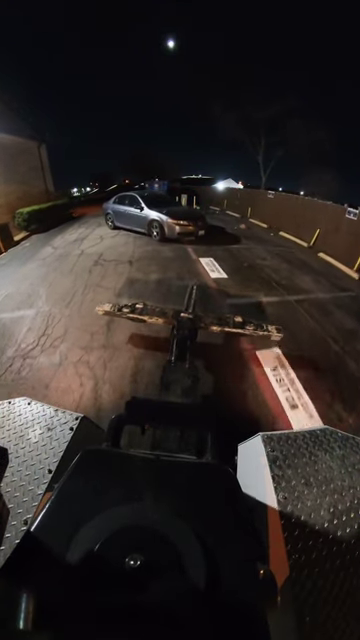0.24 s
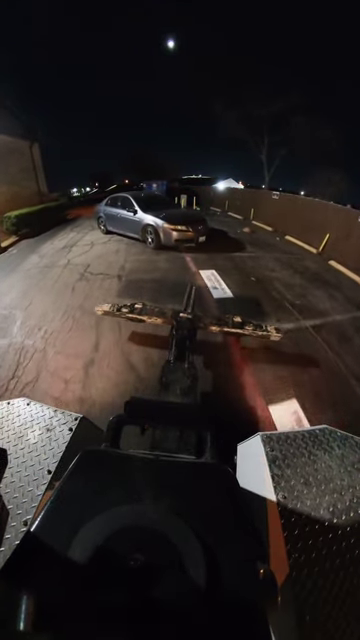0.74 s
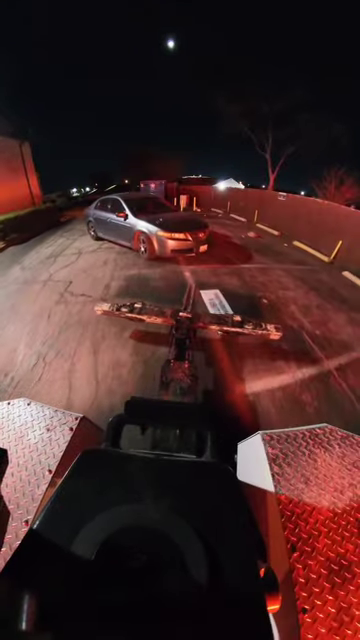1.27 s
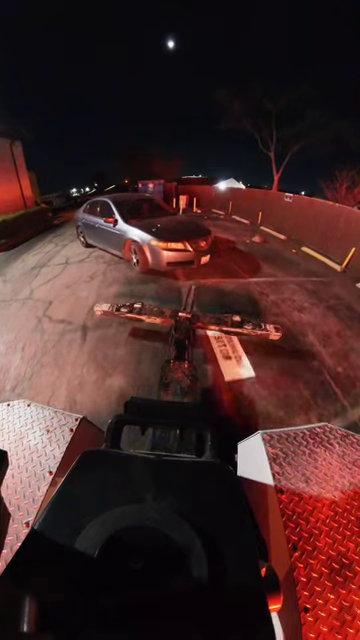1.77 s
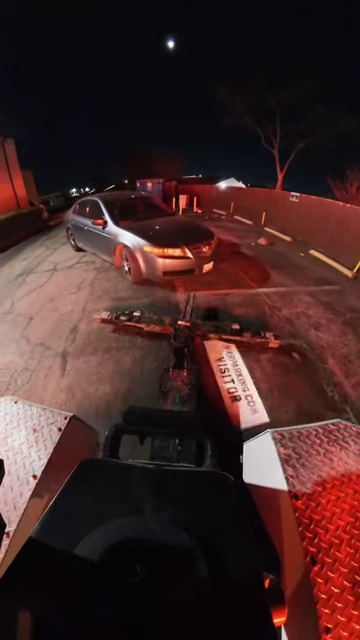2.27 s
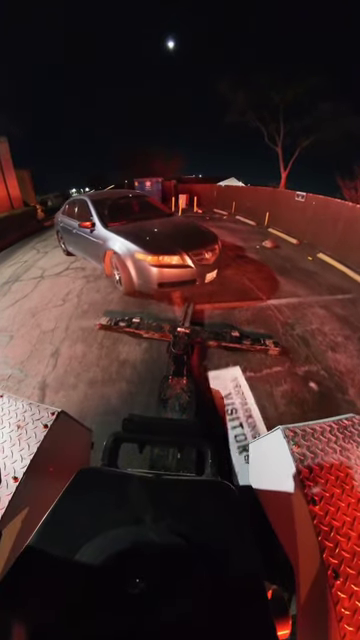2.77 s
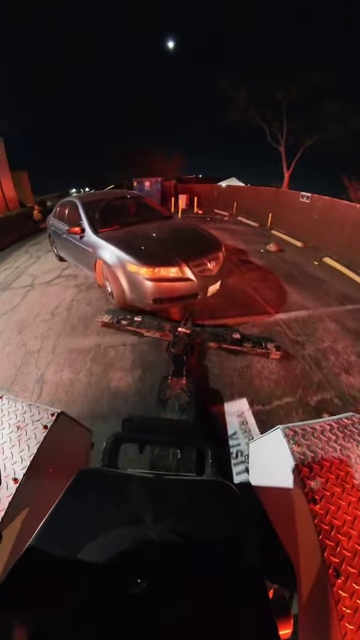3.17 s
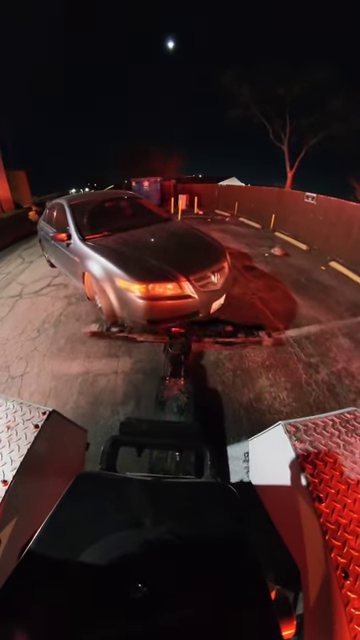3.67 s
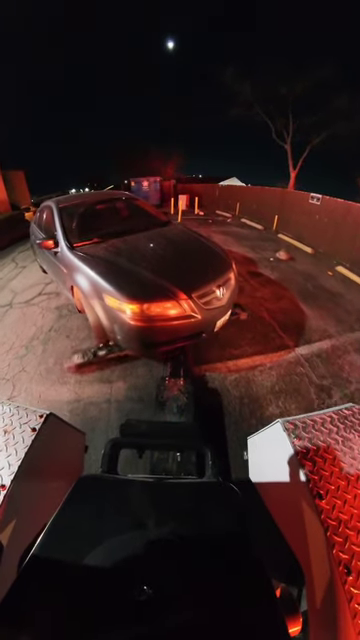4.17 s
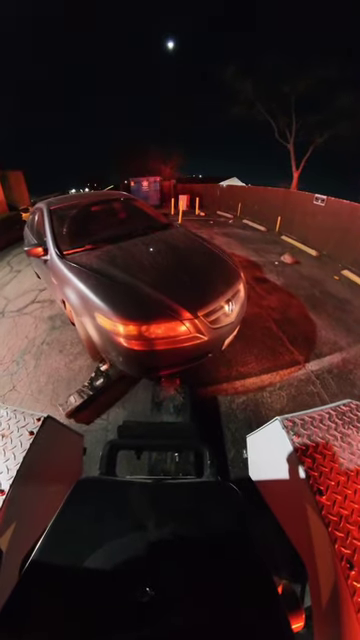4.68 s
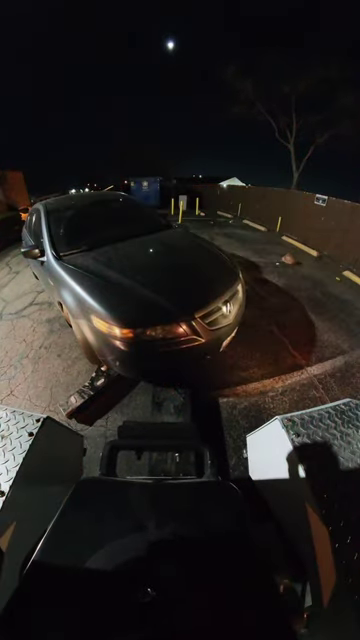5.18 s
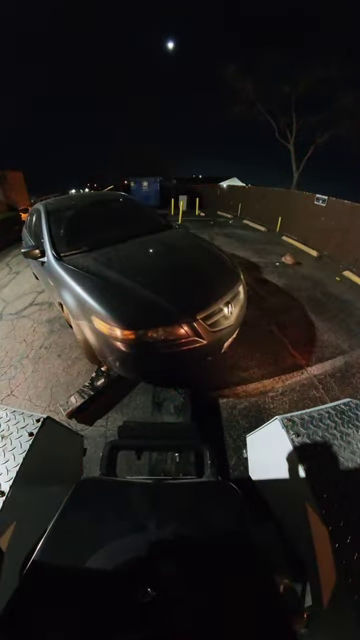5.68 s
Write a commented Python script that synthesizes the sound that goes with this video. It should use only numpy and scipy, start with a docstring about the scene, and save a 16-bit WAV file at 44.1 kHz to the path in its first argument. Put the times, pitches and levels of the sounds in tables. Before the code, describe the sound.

Low diesel rumble as a tow truck reverses, its lift whining down, clanking and grinding under a car before sharp hissing air spurts.

```python
"""A boomy diesel idle, then pump whine, clanks, steel scraping on asphalt and brake squeaks, heard from a truck's rear deck.
A tow truck backs up to a parked car, lowers its wheel lift and knocks it into place; valves spit and hiss, and
the pump winds up under load. Engine, pump and brakes are phase-integrated tones, the engine's with added noise;
the lift is modal steel driven by blows and gritty friction; the valves are shaped noise; the deck is two low modes."""
import sys
import numpy as np
from scipy import signal
from scipy.fft import rfft, irfft, next_fast_len
from scipy.io import wavfile
from scipy.ndimage import uniform_filter1d, map_coordinates

SR = 44100
rng = np.random.default_rng(int(sys.argv[2]) if len(sys.argv) > 2 else 0)


def to_wav(s):
    """Save 16-bit WAV."""
    ch = np.atleast_2d(s).T  # columns
    pcm = np.round(np.clip(ch, -1, 1) * 32767)  # PCM
    wavfile.write(sys.argv[1], SR, pcm.astype(np.int16))


N = 261513
TIME = np.arange(N) / SR
TOP_HZ = 9350  # centre of the upper band limit
PANELS = rng.standard_normal(400)  # dense panel resonances, evenly spaced up to TOP_HZ

# Spectral density of grit and loose parts: frequency_hz, relative_level_db
GRIT_SPECTRUM = [(130, -38.5), (240, -0.5), (340, 3.5), (470, 0), (770, -7.5), (900, -14.5), (1200, -19.5),
                 (1580, -16), (1950, -24.5), (3200, -27.5), (5000, -36), (6700, -35.5), (8800, -56.5)]
# Shoves of the lift: start_s, length_s, scrape_db, shudder_db, upper_deck_mode_db, lower_deck_mode_db
LIFT_SHOVES = [(1.977, 0.055, -45, -34.5, -28, -31), (2.83, 0.18, -61, -54, -33, -30),
               (3.155, 0.31, -35.5, -39, -25, -33.5), (3.553, 0.042, -38, -41, -21, -27.5),
               (3.88, 0.28, -43.5, -48.5, -25.5, -48), (4.231, 0.15, -44, -57, -31, -45),
               (4.392, 0.18, -40.5, -55, -24, -40.5), (4.684, 0.17, -36.5, -35.5, -29.5, -30.5),
               (5.197, 0.15, -40, -44, -55, -36.5), (5.533, 0.22, -50, -41, -26.5, -38)]


def amp(db):
    """Level to gain: 20 dB is a tenfold amplitude."""
    return 10 ** (np.asarray(db) / 20)


def unit(x):
    """Energy normalisation: x at rms 1."""
    return x / np.sqrt(np.mean(x ** 2) + 1e-20)


def along(points, hz):
    """Interpolation of (Hz, value) points on a logarithmic frequency axis."""
    f, v = np.transpose(points)
    return np.interp(np.log(hz + 1), np.log(f + 1), v)


def curves(rows):
    """Linear interpolation in time: one value per sample for each column after the time."""
    s, *cols = np.transpose(rows)
    return [np.interp(TIME, s, c) for c in cols]


def wobble(rate):
    """Band-limited random drift: a smooth curve through rate random knots a second."""
    knots = rng.standard_normal(int(N * rate / SR) + 4)
    return map_coordinates(knots, [TIME * rate])


def filtered(x, response):
    """Linear filtering: the spectrum of x times a response of frequency."""
    m = next_fast_len(N + SR // 2)
    return irfft(rfft(x, m) * response(np.fft.rfftfreq(m, 1 / SR)), m)[..., :N]


def gate(start, length, rise, t60):
    """Exponential decay: a linear rise centred on start, a hold, then 60 dB of fall in t60 seconds."""
    opening = np.clip((TIME - start) / rise + .5, 0, 1)
    return opening * amp(-60 * np.clip(TIME - start - length, 0, 2) / t60)


def shoves(rows, rise, t60):
    """Energy addition: joint strength of overlapping (start, length, dB) shoves."""
    return np.sqrt(sum((amp(db) * gate(start, length, rise, t60)) ** 2 for start, length, db in rows))


def waver(angle, rough, rate):
    """Phase and amplitude modulation: a tone of rms near 1 whose phase and strength drift."""
    phase = angle + rng.uniform(0, 2 * np.pi) + rough * wobble(rate)
    return np.sqrt(2) * np.sin(phase) * (1 + rough * wobble(rate))


def rush(spectrum, drive=1, patchy_db=5.5):
    """Broadband turbulence and friction: patchy, driven noise of rms 1, coloured by the truck's panels."""
    # Likeness of the two channels: frequency_hz, correlation
    likeness = [(2900, 1), (4300, .6), (7200, 1)]
    z = signal.stft(rng.standard_normal((2, N)), nperseg=1024)[2]
    field = uniform_filter1d(rng.standard_normal(z.shape[1:]), size=7, axis=0)
    field = uniform_filter1d(field, size=7, axis=1)
    patches = signal.istft(z * amp(patchy_db * unit(field)), nperseg=1024)[1]
    pair = patches[:, :N] * drive

    def colour(hz):
        turn = np.arccos(np.clip(along(likeness, hz), -1, 1)) / 2
        panels = np.interp(hz, np.linspace(0, TOP_HZ, len(PANELS)), PANELS)
        ripple_db = 1.5 * np.clip(hz / 1200, 0, 1) * panels
        return amp(along(spectrum, hz) + ripple_db) * np.array([np.cos(turn), np.sin(turn)])

    mid, side = filtered(pair, colour)
    return unit(np.array([mid + side, mid - side]))


def engine():
    """Periodic combustion: six cylinders give wavering crank orders and noise that swells with each firing."""
    # Crank speed: time_s, turns_per_s
    crank = [(0, 12.23), (1.9, 11.36), (3, 11.44), (5.93, 11.8)]
    # Tones: crank_multiple, level_db (relative to the noise, before a common 1 dB cut)
    orders = [(3, -6), (9, -2.5), (12, -5), (15, -7.5), (18, -10.5), (22, -13.5), (33, -14), (35, -6.5)]
    # Spectral density of combustion and fan noise: frequency_hz, relative_level_db
    idle_spectrum = [(20, -22), (35, -9), (100, 1.5), (210, -4.5), (335, -7), (400, -14.5), (520, -9),
                     (700, -16), (1400, -18), (1900, -25), (3250, -31), (3700, -36.5), (4900, -35),
                     (7000, -44.5), (8800, -64)]
    # Engine loudness: time_s, level_db
    idle_level = [(0, -40.5), (1.9, -39), (2.6, -39.5), (2.95, -51), (5.1, -45), (5.93, -35.5)]
    turns_per_s = curves(crank)[0] * (1 + 0.011 * wobble(14))
    angle = 2 * np.pi * np.cumsum(turns_per_s) / SR
    hum = sum(amp(db - 1 + 2.1 * wobble(6)) * waver(k * angle, rough=0.44, rate=24) for k, db in orders)
    firing = np.cos(3 * angle)  # three firings a turn
    clatter = rush(idle_spectrum, drive=amp(1.2 * firing + 1.0 * wobble(50)), patchy_db=0.76)
    return amp(curves(idle_level)[0]) * (hum + clatter)


def deck():
    """Modal resonance: the engine keeps two low deck modes humming; bumps and shoves make them boom and ring on."""
    # Low modes: frequency_hz, idle_level_db (before the drift), t60_s
    deck_modes = [(80.24, -42, 1.14), (58.27, -47.5, 2.2)]
    # Bumps that rock the deck: start_s, length_s, upper_mode_db, lower_mode_db
    bumps = [(.17, 0.052, -35, -47), (.92, 0.23, -39, -43), (4.84, 0.15, -23, -32)]
    idle_swell_db, rise_s = 4.5, 0.05  # the idle boom comes and goes
    jolts = bumps + [(start, length, *modes_db) for start, length, _, _, *modes_db in LIFT_SHOVES]
    out = np.zeros(N)
    for k, (hz, idle_db, t60) in enumerate(deck_modes):
        idle = amp(idle_db + idle_swell_db * wobble(5.5))
        mode_jolts = [(start, length, modes_db[k]) for start, length, *modes_db in jolts]
        boom = shoves(mode_jolts, rise_s, t60)
        out += np.hypot(idle, boom) * waver(2 * np.pi * hz * TIME, rough=0.23, rate=21)
    return out


def pump(rows):
    """Harmonic series of pressure pulses: two firm low harmonics, and upper ones that follow them and waver."""
    # Upper harmonics: multiple, level_db (relative to the mean dB of the lowest two)
    upper_harmonics = [(3, -10), (4, -14), (5, -21.5), (6, -28.5), (8, -26)]
    hz, first_db, second_db = curves(rows)
    angle = 2 * np.pi * np.cumsum(hz * (1 + .003 * wobble(40))) / SR
    upper = sum(amp(level + 3 * wobble(14)) * np.cos(k * angle + .4 * wobble(14))
                for k, level in upper_harmonics)
    lowest = amp(first_db) * np.cos(angle) + amp(second_db) * np.cos(2 * angle)
    stack = lowest + amp((first_db + second_db) / 2) * upper
    running = gate(rows[0][0], rows[-1][0] - rows[0][0], rise=.02, t60=.03)
    return np.sqrt(2) * stack * running


def steel_ring(t, arm_hz, scatter_db, crack_db=0):
    """Modal superposition: the joints damp the lift's modes quickly, and the frame rings on.

    A contact with little crack is soft and rings the high modes less."""
    # Modes of the steel: frequency_hz, level_db
    steel_modes = [(180, -6), (258, -8.5), (338, -2.5), (672, -2), (730, -5), (915, -11), (1180, -25),
                   (1440, -11), (1590, -12.5), (2290, -21), (3360, -24)]
    arm_db = 4  # the main bending mode is the strongest; its pitch shifts with how the arm is supported
    quick_t60_s, tail_t60_s, tail_db = 0.068, 0.2, -9.5  # quick decay is given at 500 Hz
    hz, db = np.transpose(steel_modes + [(arm_hz, arm_db)])[:, :, None]
    t60 = quick_t60_s * (500 / hz) ** .5
    onset = 1 - np.exp(-t / .001)
    decay = (amp(-60 * t / t60) + amp(tail_db - 60 * t / tail_t60_s)) * onset
    soft_db = 0.86 * crack_db * np.clip(np.log2(hz / 1100), 0, 1)
    size = amp(db + soft_db + scatter_db * rng.standard_normal(hz.shape))
    phase = .5 * rng.standard_normal(hz.shape)
    return np.sum(size * decay * np.sin(2 * np.pi * hz * t + phase), axis=0)


def clanks():
    """Impact excitation: each blow punches the arm, rings steel, cracks in joints, chatters and thumps the deck."""
    # Blows: time_s, level_db, arm_mode_hz, crack_db (relative, before a 13 dB cut), thud_db (relative)
    blows = [(2.762, -13.5, 486.6, -18, 1), (2.802, -16.5, 430.4, -11.5, -14), (2.811, -20, 544, -16, -11),
             (3.28, -25.5, 473, -9, -12), (3.305, -24, 435, -21, -20), (3.392, -26.5, 462, -18, -5),
             (4.042, -17, 475, -3, -5), (4.0545, -20, 487, -10.5, -4), (4.556, -28, 500, -11.5, -8),
             (4.568, -18.5, 510, -13.5, -3), (4.576, -25, 500, -18, -8), (4.588, -21.5, 519, -13, -3),
             (4.762, -26.5, 337, -14, -2), (4.871, -36, 460, 5, -1), (4.952, -20, 451, -9, 2),
             (5.575, -23.5, 617, 7, 5)]
    # Spectral density of a crack: frequency_hz, relative_level_db
    crack_spectrum = [(150, -18.5), (500, -7.5), (1050, 1), (1550, 3.5), (1950, -3), (2600, -4),
                      (5000, -14.5), (7500, -20), (9000, -46)]
    punch_hz, punch_db = 780, -1  # one short push, level relative to the thud
    chatter_db = -13  # loose parts just after a blow, relative to it
    t = TIME[:SR // 2]
    ring, crack, chatter = np.zeros(N + SR), np.zeros(N), np.zeros(N)
    push = np.sin(np.pi * np.clip(punch_hz * t / 2, 0, 1)) ** 2  # lasts two cycles
    punch = amp(punch_db) * np.sin(2 * np.pi * punch_hz * t) * push
    thud = amp(-60 * t / 0.2) * (1 - np.exp(-t / .003)) * np.sin(2 * np.pi * 85 * t)
    for s, db, arm_hz, crack_db, thud_db in blows:
        steel = steel_ring(t, arm_hz, scatter_db=2, crack_db=crack_db)
        ring[round(s * SR):][:len(t)] += amp(db) * (steel / 2 + amp(thud_db) * (thud - punch))
        crack = np.hypot(crack, amp(db + crack_db - 13) * gate(s + .001, 0, rise=0.002, t60=0.14))
        chatter = np.hypot(chatter, amp(db + chatter_db) * gate(s + .006, 0, rise=.008, t60=.16))
    cracking = crack * rush(crack_spectrum, drive=amp(2 * wobble(500)), patchy_db=5)
    return ring[:N] + cracking + chatter * rush(GRIT_SPECTRUM, patchy_db=2)


def friction():
    """Sliding contact: scrape and shudder hold steady while the lift rattles, and swell once for each shove."""
    # The lift is lowered, rides on the asphalt, slides under the car, takes the load: start_s, length_s, level_db
    rattles = [(2.0, 0.82, -40.5), (2.76, 1.29, -38.5), (4.38, 0.57, -37.5), (5.0, 0.46, -47.5),
               (5.46, 0.45, -34)]
    rattle_shudder_db = -1.5  # low shudder relative to the rattle
    rise_s, t60_s, swell_db = 0.12, 0.17, 4  # stronger in mid-shove than at its ends
    skew = 1.24  # the drag builds slowly and lets go faster
    rattle = shoves(rattles, rise=.04, t60=.3)
    scraping, shuddering = rattle, amp(rattle_shudder_db) * rattle
    for start, length, scrape_db, shudder_db, *_ in LIFT_SHOVES:
        arch = np.sin(np.pi * np.clip((TIME - start) / length, 0, 1) ** skew)
        swell = amp(swell_db * arch) * gate(start, length, rise_s, t60_s)
        scraping = np.hypot(scraping, amp(scrape_db) * swell)
        shuddering = np.hypot(shuddering, amp(shudder_db) * swell)
    return scraping, shuddering


def scrape():
    """Irregular slip: the dragged lift shakes, with gritty slips and small knocks that ring in its steel."""
    # Spectral density of the shudder: frequency_hz, relative_level_db
    shudder_spectrum = [(20, -29), (38, -8), (100, 6.5), (200, -0.5), (300, -21), (600, -70.5)]
    scraping, shuddering = friction()
    slips = amp(0.98 * wobble(70) + 1.4 * wobble(600))
    grit = rush(GRIT_SPECTRUM, drive=slips, patchy_db=2)
    knocks = (rng.random(N) < 130 / SR) * rng.standard_normal(N)  # about 130 a second
    steel = steel_ring(TIME[:SR // 4], arm_hz=460, scatter_db=1, crack_db=-11)
    ring = unit(signal.fftconvolve(knocks, steel)[:N])
    dragging = scraping * (amp(-2.0) * grit + amp(-9.5) * ring)
    return dragging + shuddering * rush(shudder_spectrum, drive=slips)


def tones(rows, rise, t60):
    """Narrow-band modulation: unsteady whistles, each a band of noise around a wandering pitch."""
    out = np.zeros(N)
    for start, length, hz, width, db in rows:
        band = filtered(rng.standard_normal((2, N)), lambda f: 1 / (1 + (f / width) ** 2) ** 2)
        angle = 2 * np.pi * hz * np.cumsum(1 + .0015 * wobble(20)) / SR
        whistle = unit(band[0] * np.cos(angle) + band[1] * np.sin(angle))
        out += amp(db) * gate(start, length, rise, t60) * whistle
    return out


def valves():
    """Turbulent jet noise: spurts of fluttering hiss, coloured by the hoses, with whistling edges."""
    # Spurts: start_s, length_s, level_db
    spurts = [(1.453, 0.025, -51.5), (1.998, 0.033, -47), (4.146, 0.011, -56), (4.245, 0.041, -53),
              (4.389, 0.014, -41.5), (4.678, 0.15, -59.5), (4.962, 0.069, -48.5), (5.202, 0.13, -43),
              (5.458, 0.054, -43), (5.571, 0.028, -37.5), (5.62, 0.5, -42)]
    # Spectral density of the hiss: frequency_hz, relative_level_db
    jet_spectrum = [(400, -21), (800, 5), (1900, -4.5), (4200, -2), (6000, 0), (7800, -12), (8500, -21),
                    (9200, -38)]
    # Whistles: start_s, length_s, pitch_hz, width_hz, level_db
    whistles = [(1.265, .05, 7100, 1410, -68.5), (1.465, 0.012, 3150, 200, -52.5),
                (5.21, 0.094, 5840, 130, -48.5), (5.21, 0.054, 6400, 140, -53),
                (5.6, 0.04, 6765, 140, -37.5), (5.665, 0.087, 7560, 30, -51), (5.59, .35, 7700, 800, -52.5)]
    # Broad resonances of the valve block and hoses: frequency_hz, width_hz, boost_db
    hose_modes = [(2400, 80, 2.5), (3470, 130, 2.5)]
    flow = sum(amp(db) * gate(start, length, rise=0.02, t60=0.12) for start, length, db in spurts)

    def hoses(f):
        return amp(sum(db / (1 + ((f - hz) / width) ** 2) for hz, width, db in hose_modes))

    hiss = rush(jet_spectrum, drive=amp(1.8 * wobble(70)), patchy_db=3.4)
    return flow * unit(filtered(hiss, hoses)) + tones(whistles, rise=0.017, t60=0.072)


def brakes():
    """Friction-driven oscillation: each touch is one fluttering tone that swells, sags with the grip and fades."""
    # Touches: start_s, length_s, level_db
    squeaks = [(2.85, .19, -55.5), (3.652, .23, -54)]
    pitch_hz, sag_hz, jitter_hz = 4196, 65, 48  # the pitch sags as the pads grip
    out = np.zeros(N)
    for start, length, db in squeaks:
        grip = np.sin(np.pi * np.clip((TIME - start) / length, 0, 1) ** .8)
        hz = pitch_hz - sag_hz * grip + jitter_hz * wobble(200)
        tone = np.sin(2 * np.pi * np.cumsum(hz) / SR)
        out += np.sqrt(2) * amp(db + 3 * wobble(110)) * grip * tone
    return out


def scene():
    """Superposition: all sources add, close to the middle."""
    # Pump while lowering, then loaded: time_s, pitch_hz, first_harmonic_db, second_harmonic_db
    lowering = [(1.98, 167.2, -41, -46), (2.06, 154.1, -33, -33.5), (2.116, 148.6, -30.5, -44.5),
                (2.222, 146.5, -33, -39), (2.284, 151.6, -30.5, -34), (2.436, 154, -32.5, -33),
                (2.548, 149.7, -28.5, -42.5), (2.65, 152.8, -29, -38), (2.755, 150, -32, -38.5)]
    loaded = [(5.46, 162, -40, -43), (5.64, 167.7, -50, -36.5), (5.8, 165.2, -46, -42),
              (5.86, 167.7, -37.5, -31.5), (5.93, 174.4, -35, -29.5)]
    return engine() + deck() + pump(lowering) + pump(loaded) + scrape() + clanks() + valves() + brakes()


def record(dry):
    """Band limitation: the response falls to zero across 200 Hz around TOP_HZ."""
    return filtered(dry, lambda hz: np.clip((TOP_HZ - hz) / 200 + .5, 0, 1))


dry = scene()
out = record(dry)
to_wav(out)
```